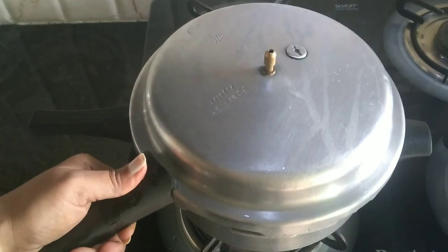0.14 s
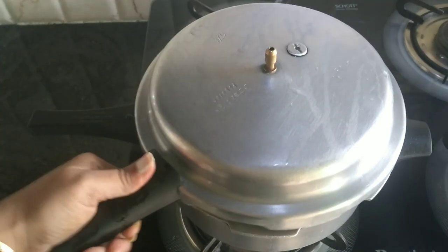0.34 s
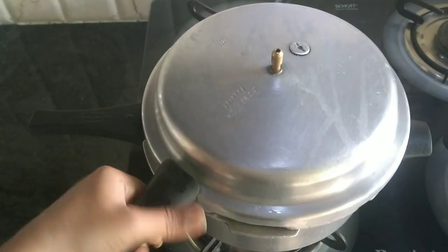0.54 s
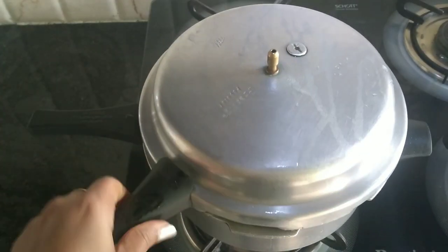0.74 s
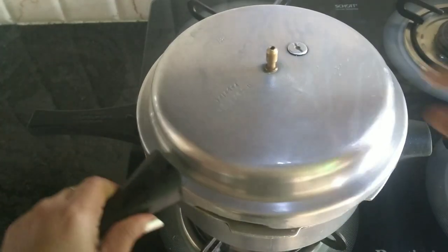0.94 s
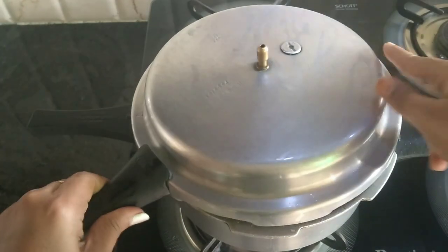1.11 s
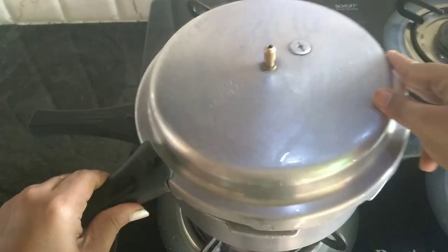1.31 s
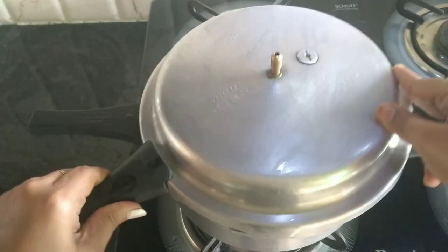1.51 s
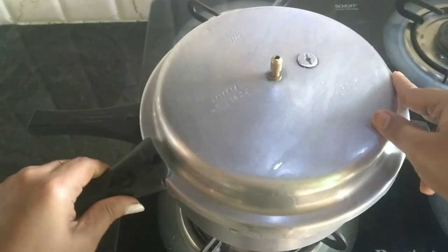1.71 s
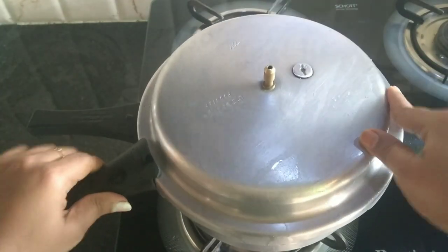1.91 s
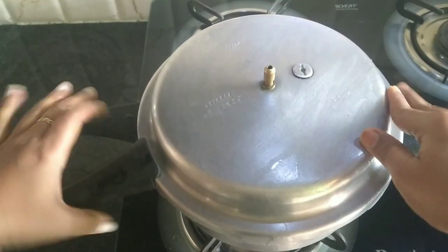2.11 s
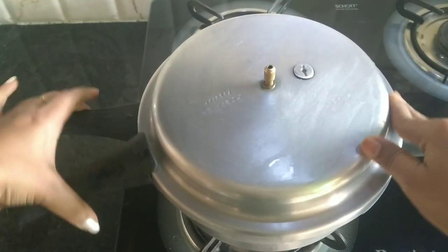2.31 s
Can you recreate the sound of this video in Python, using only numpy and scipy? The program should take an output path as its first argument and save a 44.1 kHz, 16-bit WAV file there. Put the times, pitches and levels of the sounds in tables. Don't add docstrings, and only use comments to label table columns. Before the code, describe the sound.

Metal pressure cooker lid clanks loudly twice onto its pot, rattles, is nudged, pressed and rocked, then drops into place and scrapes as it turns; close phone microphone, tiled kitchen, low air rumble.

```python
import sys
import numpy as np
from scipy import signal
from scipy.fft import rfft, irfft, next_fast_len
from scipy.io import wavfile
from scipy.ndimage import uniform_filter1d, map_coordinates

SR = 44100
rng = np.random.default_rng(int(sys.argv[2]) if len(sys.argv) > 2 else 0)


def boost_factor(decibels):
    exponent = np.asarray(decibels, float) / 20
    return 10 ** exponent


def transcribe(u):
    v = np.clip(np.atleast_2d(u).T, -1, 1)
    q = np.round(v * 32767).astype(np.int16)
    wavfile.write(sys.argv[1], SR, q)


N = 103635

# f/Hz, level per Hz/dB
CLATTER = [(90, -24), (280, -2.5), (500, -1), (1300, -10.5), (2200, -10.5), (4300, -22), (8500, -30),
           (15500, -57.5)]
# f/Hz, likeness (1 = the same)
ROOM_ALIKE = [(60, 0.78), (180, 0.89), (550, 0.7), (1650, 0.032), (4970, 0.07), (15000, -0.28)]
# f/Hz, likeness (1 = the same)
LID_ALIKE = [(200, 0.99), (600, 0.78), (1500, 0.23), (5000, 0.3)]


def unit(x):
    return x / np.sqrt(np.mean(x ** 2) + 1e-20)


def along(points, hz):
    f, v = np.transpose(points)
    return np.interp(np.log(hz + 1), np.log(f + 1), v)


def curve(rows):
    return np.interp(np.arange(N) / SR, *np.transpose(rows))


def wobble(rate):
    knots = rng.standard_normal(int(N * rate / SR) + 4)
    return map_coordinates(knots, [np.arange(N) * rate / SR])


def filtered(x, response):
    m = next_fast_len(x.shape[-1] + 2048)
    spectrum = rfft(x, m) * response(np.fft.rfftfreq(m, 1 / SR))
    return irfft(spectrum, m)[..., :x.shape[-1]]


def rush(gain, alike, size=N):
    def middle_and_side(hz):
        turn = np.arccos(np.clip(along(alike, hz), -1, 1)) / 2
        return gain(hz) * [np.cos(turn), np.sin(turn)]
    mid, side = filtered(rng.standard_normal((2, size)), middle_and_side)
    return unit(np.array([mid + side, mid - side]))


def band(centre_hz, width_hz):
    return lambda hz: 1 / (1 + (2 * (hz - centre_hz) / width_hz) ** 2)


def tilt(hz, hard):
    return boost_factor(hard * np.log2((hz + 50) / 950))


def clatter(hard, size=N):
    return rush(lambda hz: boost_factor(along(CLATTER, hz)) * tilt(hz, hard), LID_ALIKE, size=size)


def dying(x, t60s):
    hz, t, z = signal.stft(x, SR, nperseg=128)
    fade = boost_factor(-60 * t / along(t60s, hz)[:, None])
    return signal.istft(z * fade, SR, nperseg=128)[1][:, :x.shape[1]]


def late(x, lag_s):
    return filtered(x, lambda hz: np.exp(1j * np.pi * hz * lag_s * np.array([[-1], [1]])))


def kitchen():
    # f/Hz, level per Hz/dB
    tone_colour = [(110, -2.5), (350, -5), (700, -11.5), (1500, -14.5), (4500, -23.5), (6000, -32),
                   (9000, -31.5), (15500, -58)]
    # t/s, level/dB
    tone_level = [(0, -47), (.7, -49.5), (1.1, -49), (1.28, -54), (1.9, -51.5), (2.1, -49), (2.35, -49)]
    drone_level = [(0, -51.5), (1.2, -54), (1.7, -61), (2.35, -81)]
    jet_level = [(0, -60), (.6, -77), (1.9, -85), (2.05, -59), (2.35, -54.5)]
    sway = boost_factor(1.2 * wobble(8))
    tone = sway * boost_factor(curve(tone_level)) * rush(lambda hz: boost_factor(along(tone_colour, hz)) * (hz > 35), ROOM_ALIKE)
    drone = boost_factor(curve(drone_level) + 0.56 * wobble(18.6)) * rush(band(507, 118), ROOM_ALIKE)
    jet = boost_factor(curve(jet_level)) * rush(band(4525, 470), ROOM_ALIKE)
    hum = boost_factor(-59.5) * rush(band(100, 2.7), ROOM_ALIKE)
    return tone + drone + jet + hum


def air():
    # f/Hz, level per Hz/dB
    rumble = [(9, -24), (20, 3), (27, -7), (40, -14.5), (62, -24), (80, -31.5), (130, -68)]
    # t/s, level/dB
    puffs = [(0, -32), (.25, -53), (.31, -30), (.39, -53), (.61, -35.5), (.86, -44.5), (.91, -31),
             (1.02, -30.5), (1.14, -38.5), (1.27, -35), (1.35, -41.5), (1.66, -40), (1.89, -45),
             (2.02, -33.5), (2.08, -38.5), (2.15, -34), (2.23, -43), (2.35, -38.5)]
    x = rush(lambda hz: boost_factor(along(rumble, hz)) * (hz < 130) * (hz > 8), [(20, 0.97), (100, 1.0)])
    power = uniform_filter1d((x ** 2).mean(0), 3000)
    steady = x / np.sqrt(np.abs(power) + 0.014)
    return boost_factor(curve(puffs)) * steady


def bumps():
    # t/s, level/dB, f/Hz
    thumps = [
        (0.302, -39, 99.7),
        (0.601, -38, 100),
        (1.712, -29.5, 97.4),
        (2.06, -40.5, 95.4),
    ]
    rise_s, t60_s = 0.013, 0.28
    out = np.zeros(N)
    for s, db, hz in thumps:
        after = np.maximum(np.arange(N) / SR - s, 0)
        swell = boost_factor(db - 60 * after / t60_s) * (1 - np.exp(-after / rise_s))
        out += swell * np.sin(2 * np.pi * hz * after)
    return out


def walls(x):
    # f/Hz, t60/s
    fading = [(200, 0.27), (2000, 0.29), (10000, 0.14)]
    tail = dying(rush(np.ones_like, LID_ALIKE, size=SR // 2), fading)
    tail = tail / np.linalg.norm(tail[0])
    source = np.pad(x.mean(0), (200, 0))[None]
    return signal.fftconvolve(source, tail, axes=1)[:, :N]


def scrapes():
    # start t/s, peak t/s, end t/s, level/dB, hardness/(dB per octave)
    slides = [
        (1.668, 1.726, 1.809, -31.5, 3),
        (0.7875, 0.79, 0.98, -41, 1),
        (2.1, 2.22, 2.38, -54.5, 4),
    ]
    # f/Hz, width/Hz, level/dB
    tones = [(993, 30, 0), (1404, 50, -15), (2225, 120, -17), (3050, 150, -22), (3700, 300, -21)]
    # t/s, level/dB
    singing = [(1.702, -57), (1.71, -29), (1.73, -31.5), (1.754, -32), (1.766, -56.5), (1.81, -62),
               (1.83, -77)]

    def lid_colour(hz):
        return sum(boost_factor(db) * band(centre, width)(hz) for centre, width, db in tones)

    out = boost_factor(curve([(0.0069, -120)] + singing + [(1.76, -120)])) * rush(lid_colour, LID_ALIKE)
    edge_db, slip_db = -24.5, 5
    for start, peak, end, db, hard in slides:
        push = curve([(start - .002, -90), (start, edge_db), (peak, 0), (end, edge_db), (end + .06, -60)])
        grit = clatter(hard)
        out += boost_factor(db + push + slip_db * wobble(300)) * grit
    return out


def ring(grip, hard, free, t):
    pot_hz = [180, 226, 268, 405, 448, 522, 575, 640, 790]
    lid_hz = [870, 991, 1165, 1235, 1300, 1379, 2370, 1773, 1872, 1970, 2225, 4150, 3600, 4720]
    pot_t60 = [0.37, 0.49, 0.13, 0.17, 0.12, 0.15, 0.042, 0.015, 0.036]
    lid_t60 = [.1, 0.13, .1, 0.075, 0.056, 0.15, .14, 0.19, 0.23, 0.099, .22, 0.15, 0.12, 0.23]
    hz = np.concatenate((pot_hz, lid_hz))
    t60 = np.concatenate((pot_t60, lid_t60))
    lines = np.where(hz > 2500, 5, 1)
    columns = (np.arange(len(hz)), hz, np.concatenate(grip), t60, lines)
    order, hz, db, t60, lines = (np.repeat(v, lines)[:, None] for v in columns)
    turn = np.arccos(np.clip(along(LID_ALIKE, hz), 0, 1)) / 3 * np.cos(np.pi * order)
    spread_hz = 140 * (lines > 1) * np.minimum(hz / 3600, 1) ** 3
    hz = hz + spread_hz * rng.standard_normal(hz.shape)
    fade = boost_factor(db - 60 * t / (t60 * free))
    rise = 1 - np.exp(-t / 0.0035)
    size = fade * tilt(hz, hard) * rise * 1.327 / lines ** 0.53
    return np.array([(size * np.sin(2 * np.pi * hz * t + side * turn)).sum(0) for side in (1, -1)])


def clanks():
    # t/s, level/dB, hardness/(dB per octave), ring length under the hand (0 to 1)
    set_down = [
        (.241, -8.5, -1.5, 0.41),
        (.2465, -5.5, 1.5, .9),
        (.252, -15, -0.5, 0.58),
        (.275, -18.5, 3, 0.73),
    ]
    rebound = [
        (.289, -24.5, -11.5, 0.69),
        (.3065, -12.5, 0.5, 0.76),
        (.376, -20.5, 0, 0.55),
    ]
    drop = [
        (.4625, -13.5, 1, 0.6),
        (.467, -5, 1.2, 0.81),
        (.479, -7.5, 0.5, 0.9),
    ]
    rattle = [
        (.51, -25, 1.6, 0.66),
        (.538, -15, 0.22, 0.66),
        (.546, -18, 0, 0.51),
        (.555, -26, 0.34, 0.65),
        (.568, -26, 0, 0.8),
    ]
    shift = [
        (.751, -24.5, 0, 0.7),
        (.776, -26, -2, 0.61),
        (.803, -33, 2, .4),
        (.814, -15.5, -2.5, 0.67),
        (.833, -30, -7, 0.4),
        (.848, -30, -9, 0.42),
        (1.02, -31, -4.5, 0.58),
    ]
    press = [
        (1.352, -12, -1.64, 0.99),
        (1.366, -19.5, 1, 1),
    ]
    rock = [
        (1.42, -12.5, 0.53, 0.9),
        (1.4575, -17, -1.1, 0.96),
    ]
    seat = [
        (1.512, -9.5, -4, 0.21),
        (1.517, -4, -0.82, 0.59),
        (1.56, -29, 2, 1),
        (1.6, -32.5, -11, 0.58),
    ]
    turned = [
        (1.6495, -23, -2.5, 0.28),
        (1.673, -14.5, -7.5, 0.2),
        (1.689, -18, -4, 0.77),
    ]
    touch = [
        (2.067, -29, -.6, .4),
        (2.1895, -27, -2, .3),
    ]
    ticks = [(.7875, -18, 4, 0.57), (1.69, -30, -2.5, 0.21), (1.712, -21, 1, 0.33), (1.7255, -19, 6, 0.41),
             (1.742, -25, -1, .3), (1.766, -23, 3, .3), (2.067, -19.5, 1.95, 0.82),
             (.376, -21.5, -3.5, 0.25), (.4665, -25, -0.5, 0.5)]
    # pot levels/dB, lid levels/dB
    loose = [-40, -12.5, -13, -13.5, -22, -1.5, 3, -19, -12], [-5, -3, 0, -7, -26, -3, -14, -9.5, -7.5, -7,
             -15.5, -33, -6, -41]
    lifted = [-40, -16, -16, -16, 0.5, -1, -21, -18, -21], [-8, -3.5, -8.5, -24, -22, -6.5, -26, -12.5, -17,
              -17, -14.5, -32, -5, -18]
    tilted = [-31, -24.5, -19, -9.5, -7, -17, -25, -10.5, -15], [-0.5, -7, -5, 1, -33, 0, -11, -12.5, -11,
              -5, -9, -15.5, -4, -29]
    rolling = [-35, -15, -27, -10.5, -12, -13, -6, -9, -25], [-7, -6, -6, -11, -24, -11, -23, -13.5, -14,
               -9, -29, -15, -0.5, -18]
    low_held = [-48, -20.5, -12, -21.5, -0.5, 1, -1.5, -29, -16], [-10.5, -5, -3.5, -7.5, -33, -10.5, -23,
                -18, -9, -13, -9, -17, -2.5, -26]
    held = [-45, -20, -9.5, -35, -6.5, 3.5, 2.5, -23, -29], [-30, -0.5, -16, 7, -26, -1.5, -25, -21.5,
            -12.5, -28, -14, -21, -3.5, -23]
    rocking = [-38, -25, -24, -20, -8, -3.5, 1.5, -23, -27], [-17, 1.5, -4, -1, -19, -11, -16, -22, -16,
               -13.5, -12.5, -20.5, -5, -28]
    seated = [-27, -18.5, -27, -1.5, -10, -12, -24, -24, -37], [-35, -4.5, -22, 2, 2.5, -12.5, -15.5, -19,
              -22, -31, -16, -16.5, -5.5, -27]
    turning = [-21, -17.5, -18, -1, -4.5, -6, -12, -13, -25], [-14, -4.5, 0, -8, -22, -5.5, -18, -12, -19,
               -25, -22, -29, -2, -29]
    # f/Hz, t60/s
    clatter_dies = [(200, 0.21), (1500, 0.11), (5000, 0.28), (14000, 0.093)]
    moves = [(set_down, loose), (rebound, lifted), (drop, tilted), (rattle, rolling), (shift, low_held),
             (press, held), (rock, rocking), (seat, seated), (turned, turning), (touch, tilted), (ticks, None)]
    out = np.zeros((2, N + SR))
    t = np.arange(SR // 4) / SR
    blow = 1 + boost_factor(-0.5) * np.exp(-t / 0.0065)
    for hits, grip in moves:
        for s, db, hard, free in hits:
            noise = clatter(hard, len(t))
            hit = boost_factor(-13) * dying(noise, np.multiply(clatter_dies, [1, free]))
            if grip:
                hit = hit + boost_factor(-7.5) * ring(grip, hard, free, t)
            start = round(s * SR)
            out[:, start:start + len(t)] += boost_factor(db) * hit * blow / 2
    return out[:, :N]


def scene():
    lid = clanks() + scrapes()
    room = boost_factor(-5.5) * walls(lid) + kitchen()
    return late(lid, 0.00007) + late(room, 0.00012) + bumps() + air()


def top_cut(x):
    return signal.sosfilt(signal.butter(12, 15610, fs=SR, output="sos"), x)


def record(dry):
    # f/Hz, level/dB
    microphone = [(8800, -0.5), (10500, -7), (15400, -9.5), (15700, -51)]
    # start t/s, held until t/s, back by t/s, treble level/dB
    mutes = [
        (1.298, 1.3505, 1.3515, -25),
        (1.937, 1.965, 2.06, -22),
    ]
    x = filtered(dry, lambda hz: boost_factor(along(microphone, hz)))
    ceiling = .62
    x = x / (1 + np.abs(x / ceiling) ** 4) ** .25
    for start, held, back, db in mutes:
        dull = filtered(x, lambda hz: np.maximum(1 / (1 + (hz / 1960) ** 2), boost_factor(db)))
        share = curve([(start - .004, 0), (start, 1), (held, 1), (back, 0)]) ** 1.1
        x = share * dull + (1 - share) * x
    hiss = boost_factor(-84) * rush(lambda hz: hz < 15600, [(1000, 0)])
    return top_cut(x + hiss)


dry = scene()
out = record(dry)
transcribe(out)
```